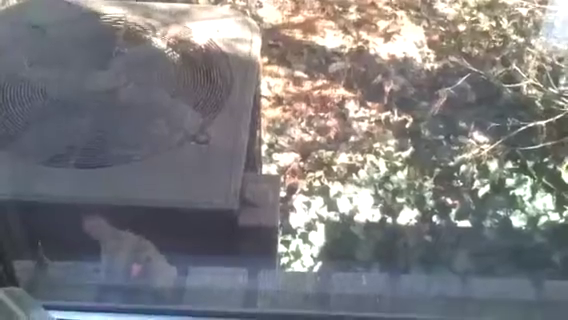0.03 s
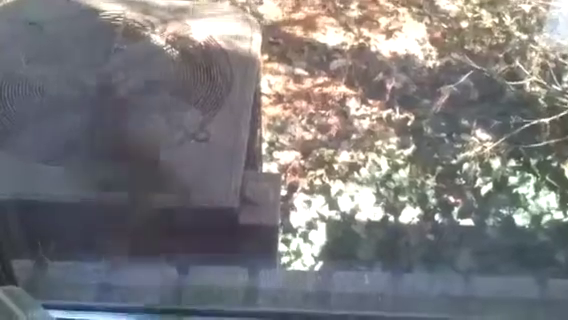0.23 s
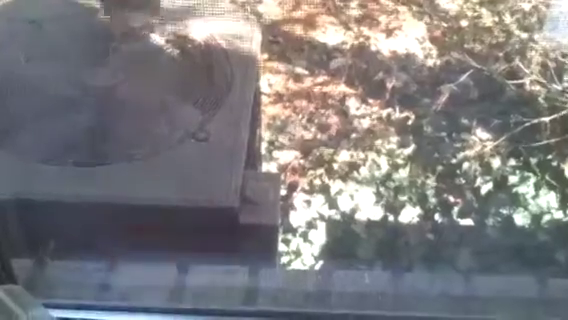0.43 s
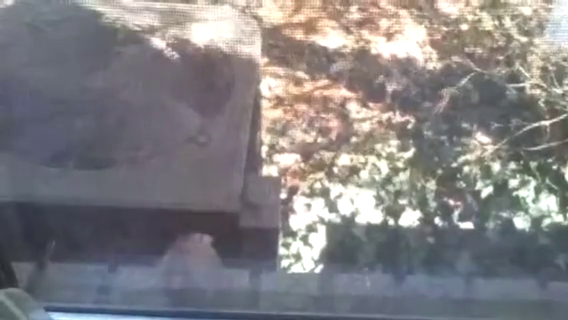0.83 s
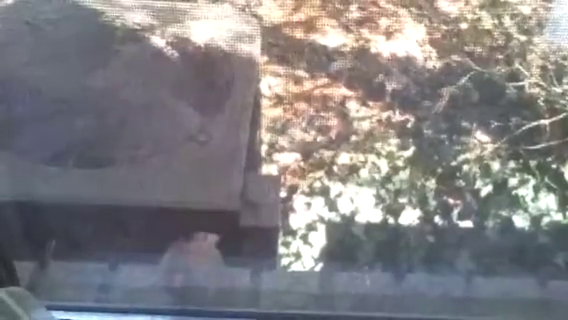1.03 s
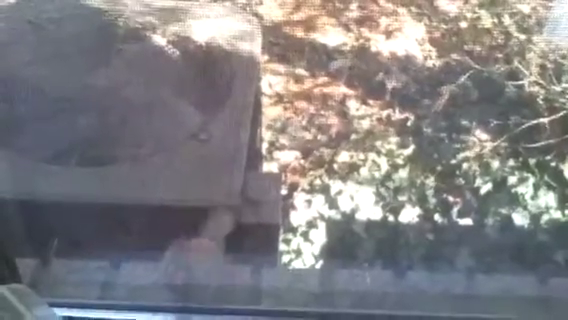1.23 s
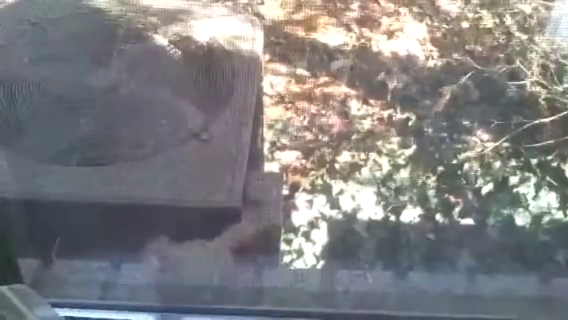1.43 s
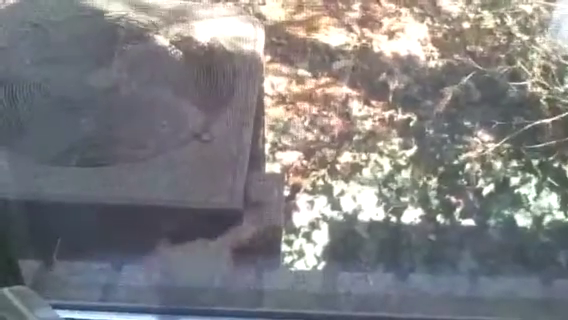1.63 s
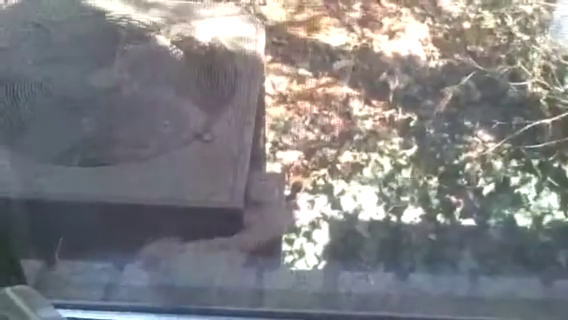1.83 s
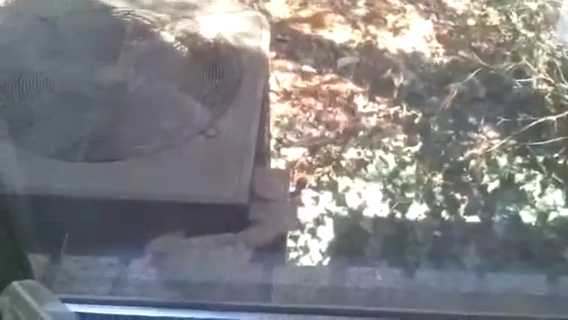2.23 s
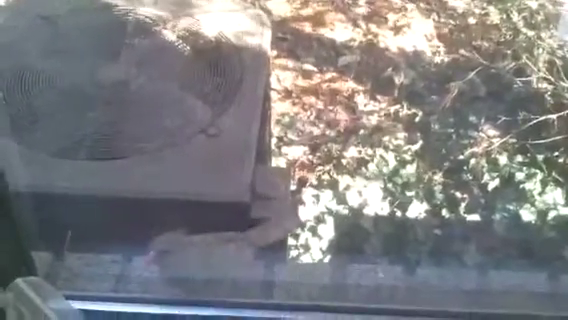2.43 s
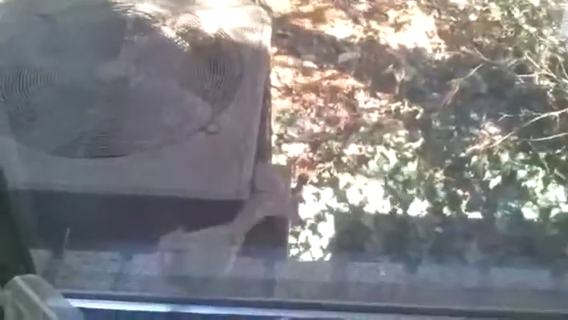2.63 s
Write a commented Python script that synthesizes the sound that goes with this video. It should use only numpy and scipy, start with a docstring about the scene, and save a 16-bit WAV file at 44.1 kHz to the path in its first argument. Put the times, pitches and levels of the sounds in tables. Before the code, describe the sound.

Two sharp knocks sound on a window, heard close up in a small room as a low ventilation hum fades in. At about 0.25 seconds a dull, full knock rings the pane and clacks the sash, followed by a lighter contact and faint ticks. At 1.5 seconds comes a harder, brighter knock. After a tiny tick near 1.9 seconds, only the quiet hum remains.

```python
"""A small quiet room, one microphone close to the window. Ventilation hum fades in and stays underneath.
At 0.25 s a sharp knock lands, dull and full: it pushes the pane, which rings low, and makes the sash
clack in its frame. A lighter contact follows, and the sash ticks as it settles.
At 1.5 s a second knock hits another spot, harder and brighter, again with a lighter contact behind it.
One last faint tick, then only the ventilation."""
import sys
import numpy as np
from scipy import signal
from scipy.fft import rfft, irfft, next_fast_len
from scipy.io import wavfile
from scipy.ndimage import map_coordinates

SR = 44100
rng = np.random.default_rng(int(sys.argv[2]) if len(sys.argv) > 2 else 0)


def waveform_to_disk(signal):
    """Save audio, clipped to [-1, 1], as 16-bit WAV at the path in sys.argv[1]."""
    frames = np.transpose(np.atleast_2d(signal))
    scaled = np.clip(frames, -1, 1) * 32767
    samples = np.round(scaled).astype(np.int16)
    wavfile.write(sys.argv[1], SR, samples)


N = 119070

# recorder fade-in: t/s, gain/dB
FADE_IN = [(0, -60), (.045, -38.5), (0.084, -15.5), (.15, -9.5), (.24, -1), (.32, 0.5)]
# spectrum of the room's air noise: f/Hz, relative level/dB
AIR_SPECTRUM = [(20, -9), (50, 1), (85, -8), (115, -5.5), (145, -4.5), (185, -8.5), (248, -13), (285, -19),
                (400, -17), (700, -23.5), (1000, -24), (1400, -30), (2450, -32), (2700, -35), (5000, -37),
                (7500, -38.5), (8700, -41.5), (9700, -50), (10300, -59)]
# fan and motor tones: f/Hz, level/dB
HUM_TONES = [(47, -57.5), (111, -48.5), (189, -55), (229, -56), (248, -55.5), (336, -61.5), (442, -66.5),
             (592, -63), (757, -64.5), (778, -69.5), (884, -67), (1590, -71.5)]
# contacts on the window: t/s, spot (0 or 1), push/dB, pane/dB, frame/dB, clatter/dB, crack/dB
CONTACTS = [(.2472, 0, -15, -22.5, -41.5, -26, -25.5), (.3067, 0, -24, -29, -45.5, -34.5, -30),
            (1.5093, 1, -24, -26.5, -38.5, -32.5, -20), (1.5269, 1, -29, -49, -42, -33, -29)]
# modes of the pane and of the frame: f/Hz, T60/s, level struck on spot 0/dB, on spot 1/dB
PANE_MODES = [(118, 0.39, -18, -8), (194, 0.14, -6, -28), (232.3, 0.28, -3.5, -3.5), (337.7, 0.3, 0.5, -19),
              (348.6, 0.36, -34, -1.5), (408.7, 0.51, -14, -21), (437.4, 0.35, -31, -4),
              (459, 0.32, -2.5, -15), (513, 0.36, 1.5, -10), (590.5, 0.21, -4, -5), (659, .28, -21, -2.5),
              (738, 0.11, -10, 1.5), (840, 0.19, -14, -33), (951, 0.52, -24, -28)]
FRAME_MODES = [(1276, 0.27, -7, -2.5), (1523, 0.16, 0, -13.5), (1712, .16, -7, -5), (2086, 0.11, 3.5, -4.5),
               (2210, 0.19, -7, -2), (2390, 0.13, -19, -2), (2456, .17, -15, -4), (3514, 0.067, 3.5, -6),
               (4390, 0.077, 0.5, -4), (4510, .12, -5, -11), (4630, 0.17, -4.5, 0), (5360, 0.1, -5, -5),
               (6520, 0.13, -13, -10)]
# spectrum of the clatter of sash and room: f/Hz, relative level on spot 0/dB, on spot 1/dB
CLATTER_SPECTRA = [(80, -17, -22), (170, -5, -2), (330, 2, 0), (537, 1.5, 6), (724, -2, -2),
                   (880, -10.5, -9.5), (1680, -5, -4.5), (2480, -11, -2.5), (3270, -24, -14.5),
                   (3660, -12, -15.5), (4500, -18.5, -10), (6000, -17.5, -17.5), (7700, -29.5, -17),
                   (8770, -39, -26), (10300, -65, -48)]
# decay of the clatter: f/Hz, T60/s
CLATTER_DECAY = [(150, 0.26), (500, 0.4), (1500, 0.13), (4500, 0.19), (9000, 0.17)]
# spectrum of hard parts meeting: f/Hz, relative level/dB
CRACK_SPECTRUM = [(500, -4), (2000, -5), (3200, -17), (4600, 4), (6000, -4), (7000, -2), (8000, -18.5),
                  (9000, -18), (10300, -63.5)]
# ticks: t/s, level/dB, f/Hz; the first is a bright snap within the first knock, the rest come as the sash
# settles
TICKS = [(0.2495, -32, 5000), (.268, -34, 3840), (.339, -49, 7000), (0.737, -50, 5800),
         (0.811, -62, 9500), (1.872, -62, 9600)]

RING_T = np.arange(int(SR * .6)) / SR  # time since a contact, t/s
SNAP_RISE_S = 0.00087  # attack of cracks and ticks


def amp(db):
    """Decibels to gain."""
    return 10 ** (np.asarray(db) / 20)


def along(points, hz):
    """Read (f/Hz, value) points on a log frequency axis."""
    freqs, values = np.transpose(points)
    return np.interp(np.log(hz + 1), np.log(freqs + 1), values)


def filtered(x, response):
    """Filter x by a gain given as a function of frequency."""
    size = next_fast_len(len(x) + SR // 2)
    return irfft(rfft(x, size) * response(np.fft.rfftfreq(size, 1 / SR)), size)[:len(x)]


def noise(spectrum, size):
    """Coloured noise of rms 1."""
    x = filtered(rng.standard_normal(size), lambda hz: amp(along(spectrum, hz)))
    return x / np.sqrt(np.mean(x ** 2) + 1e-20)


def wobble(per_s):
    """A smooth random curve with per_s knots a second."""
    return map_coordinates(rng.standard_normal(256), [np.arange(N) * per_s / SR], mode="wrap")


def fall(t, t60):
    """Exponential decay by 60 dB in t60 seconds."""
    return np.exp(-np.log(1000) * t / t60)


def rise(seconds):
    """Attack of a struck sound."""
    return 1 - np.exp(-RING_T / seconds)


def add(track, start_s, sound):
    """Mix a sound in at start_s."""
    part = track[round(start_s * SR):][:len(sound)]
    part += sound[:len(part)]


def ventilation():
    """Room tone: steady low air noise with slightly unsteady fan and motor tones."""
    t = np.arange(N) / SR
    air_db = -43 - 1.08 * wobble(per_s=9)
    air = amp(air_db) * noise(AIR_SPECTRUM, N)
    hum = np.zeros(N)
    for hz, db in HUM_TONES:
        phase = 2 * np.pi * (hz * t + rng.random()) + wobble(per_s=6.96)
        hum += amp(db) * np.sqrt(2) * np.sin(phase)
    return air + hum


def push(hz=240):
    """The pane gives way and springs back in about one cycle."""
    swing = -np.sin(2 * np.pi * hz * RING_T) * fall(RING_T, t60=.02) * rise(seconds=.002)
    return swing / np.abs(swing).max()


def ring(modes, spot, rise_s, scatter_db=3.5):
    """Damped modes of pane or frame; the struck spot sets how strongly each one speaks."""
    ringing = np.zeros(len(RING_T))
    for k, (hz, t60, *spot_db) in enumerate(modes):
        gain = (-1) ** k * amp(spot_db[spot] + scatter_db * rng.standard_normal())
        ringing += gain * fall(RING_T, t60) * np.sin(2 * np.pi * hz * RING_T)
    return ringing * rise(rise_s)


def clatter(spot):
    """Countless close modes of sash and room, the treble dying first."""
    spectrum = [(hz, spot_db[spot]) for hz, *spot_db in CLATTER_SPECTRA]
    hz, t, bands = signal.stft(noise(spectrum, len(RING_T)), SR, nperseg=256)
    decay = fall(t, along(CLATTER_DECAY, hz)[:, None])
    _, tail = signal.istft(bands * decay, SR, nperseg=256)
    return tail[:len(RING_T)] * rise(seconds=.0015)


def crack():
    """The brief bright snap of hard parts meeting."""
    return noise(CRACK_SPECTRUM, len(RING_T)) * fall(RING_T, t60=0.033) * rise(SNAP_RISE_S)


def tick(hz, db_per_octave=41):
    """A tiny dry click around one pitch."""
    spectrum = [(hz / 4, -2 * db_per_octave), (hz / 2, -db_per_octave), (hz, 0), (hz * 2, -db_per_octave)]
    return noise(spectrum, len(RING_T)) * fall(RING_T, t60=0.037) * rise(SNAP_RISE_S)


def window():
    """Close up, each contact pushes the pane, rings pane and frame and rattles the sash; ticks follow."""
    track = np.zeros(N)
    for start_s, spot, push_db, pane_db, frame_db, clatter_db, crack_db in CONTACTS:
        knock = (amp(push_db) * push()
                 + amp(pane_db) * ring(PANE_MODES, spot, rise_s=0.012)
                 + amp(frame_db) * ring(FRAME_MODES, spot, rise_s=0.00074)
                 + amp(clatter_db) * clatter(spot)
                 + amp(crack_db) * crack())
        add(track, start_s, knock)
    for start_s, db, hz in TICKS:
        add(track, start_s, amp(db) * tick(hz))
    return track


def scene():
    """At the microphone: the nearby window over the room tone, in mono."""
    return (window() + ventilation())[None]


def record(dry):
    """The recorder fades in as it starts and keeps nothing above its band limit."""
    top_hz, edge_hz = 10450, 400
    fade = amp(np.interp(np.arange(N) / SR, *np.transpose(FADE_IN)))
    band_limit = lambda hz: np.clip((top_hz - hz) / edge_hz, 0, 1)
    return np.array([filtered(channel * fade, band_limit) for channel in dry])


dry = scene()
out = record(dry)
waveform_to_disk(out)
```